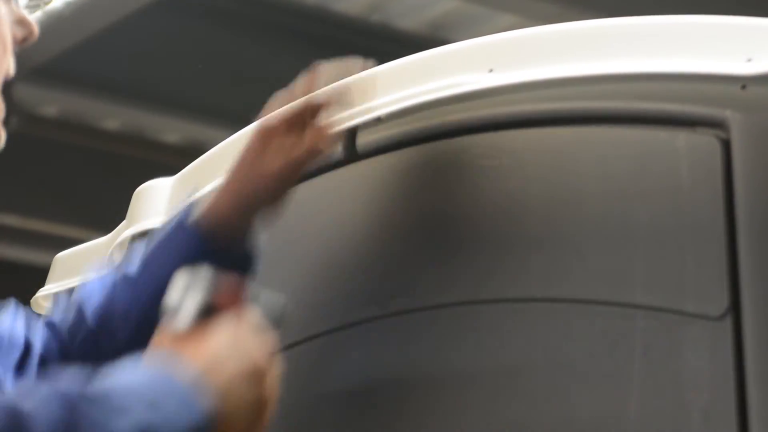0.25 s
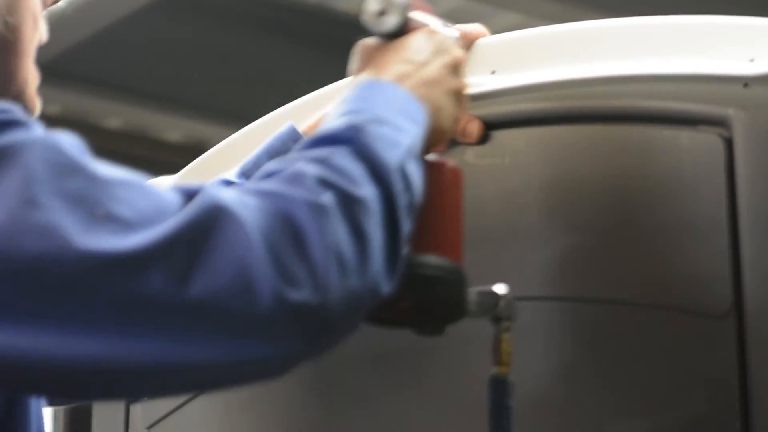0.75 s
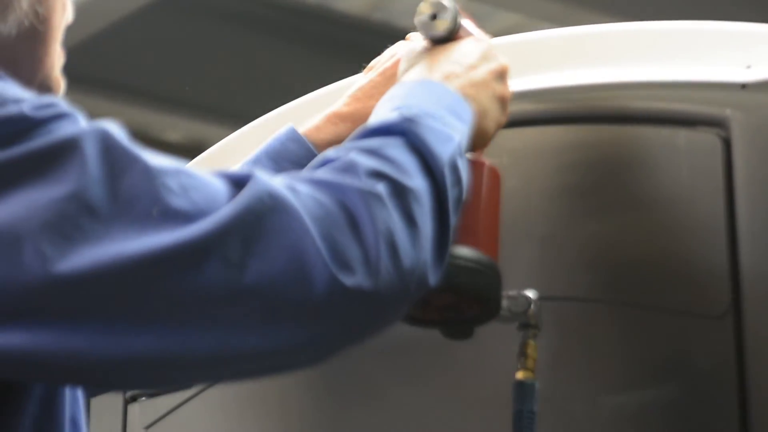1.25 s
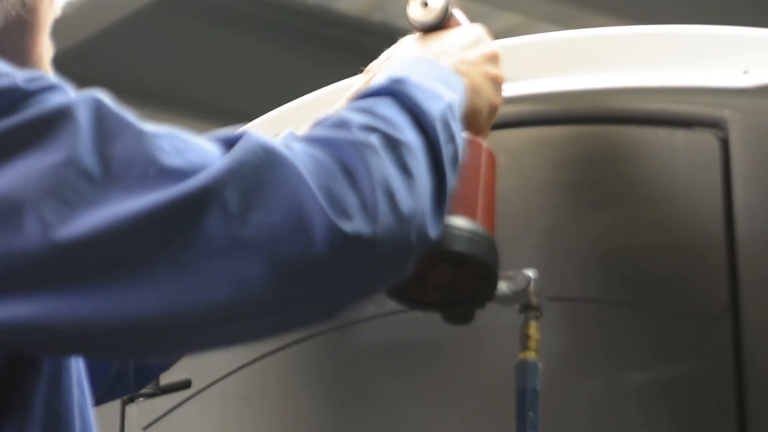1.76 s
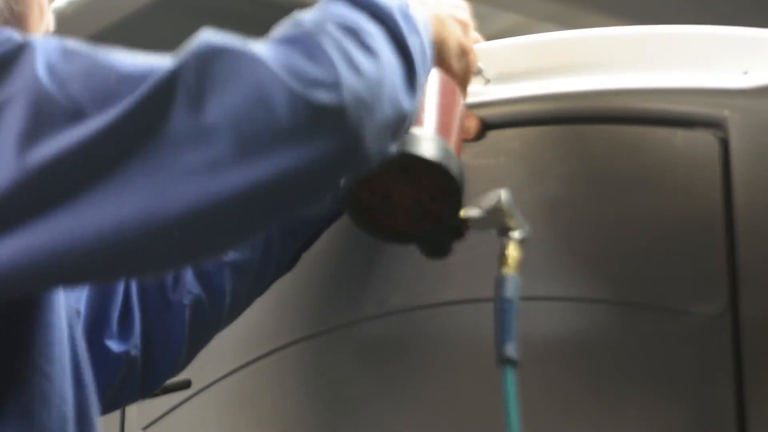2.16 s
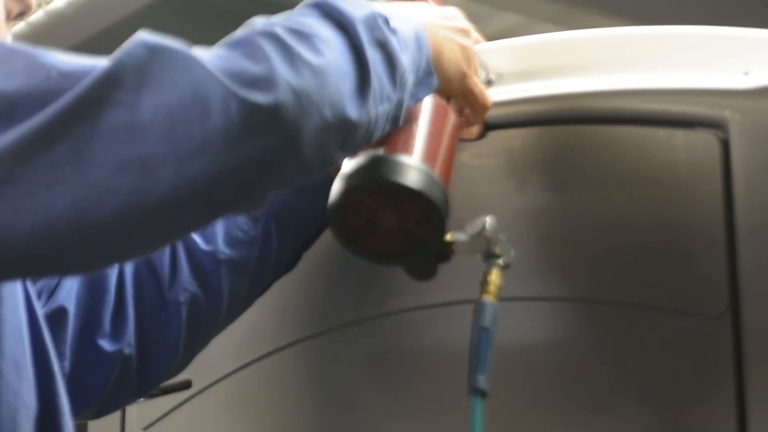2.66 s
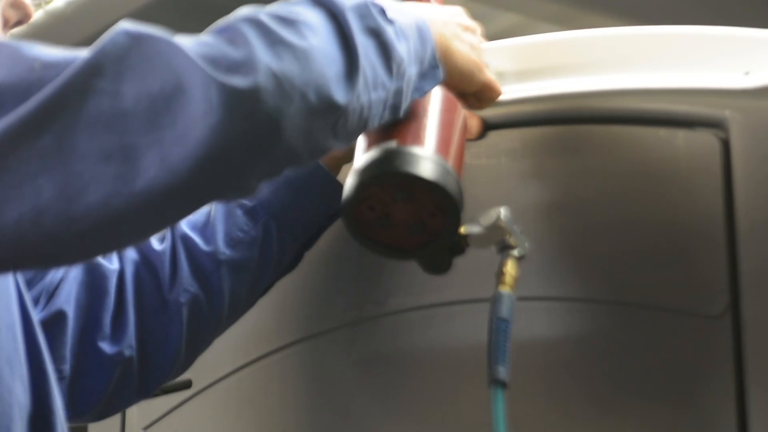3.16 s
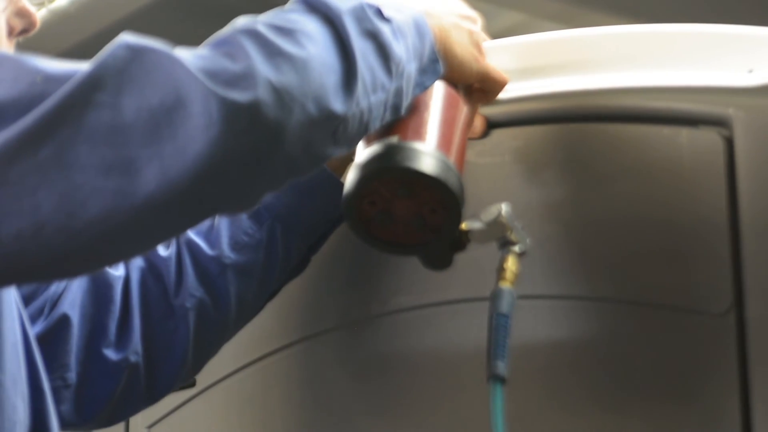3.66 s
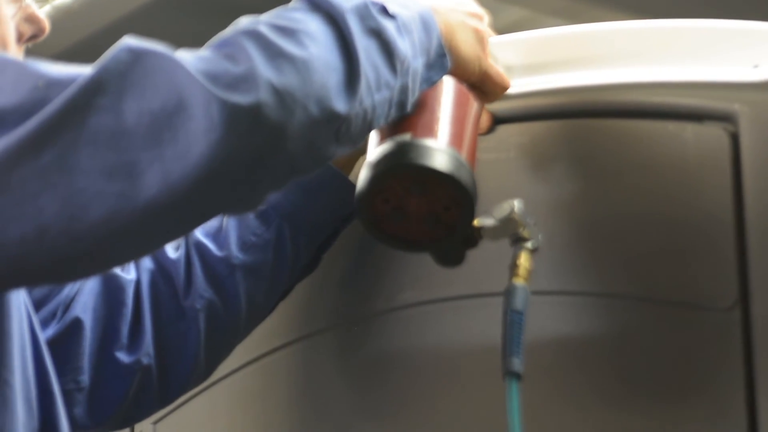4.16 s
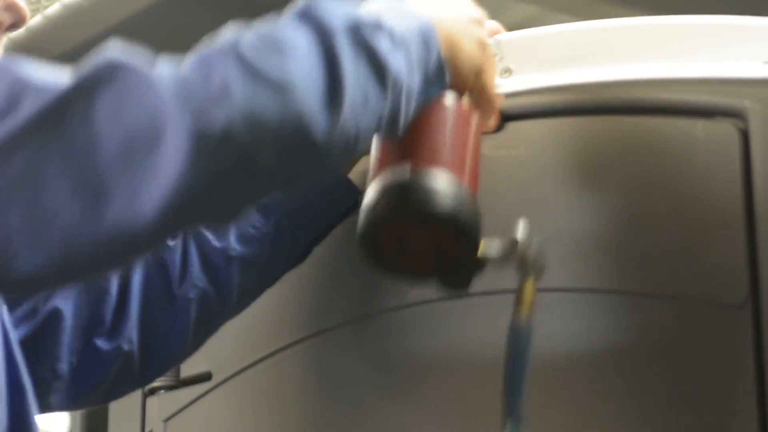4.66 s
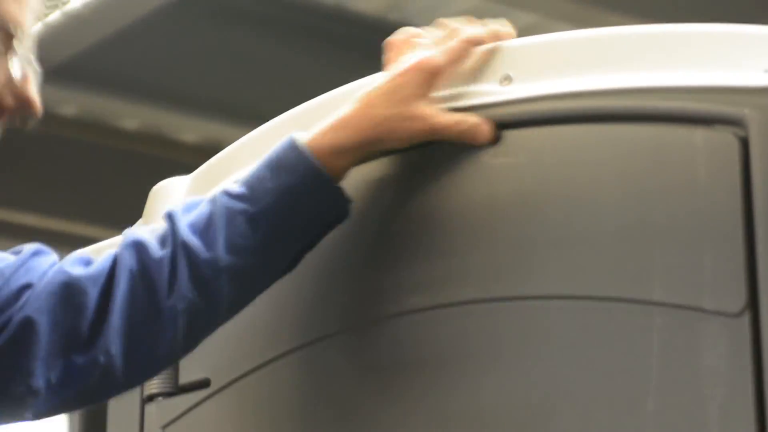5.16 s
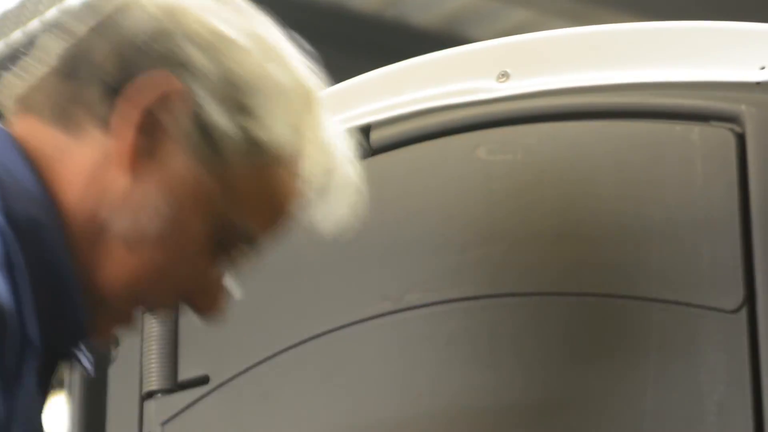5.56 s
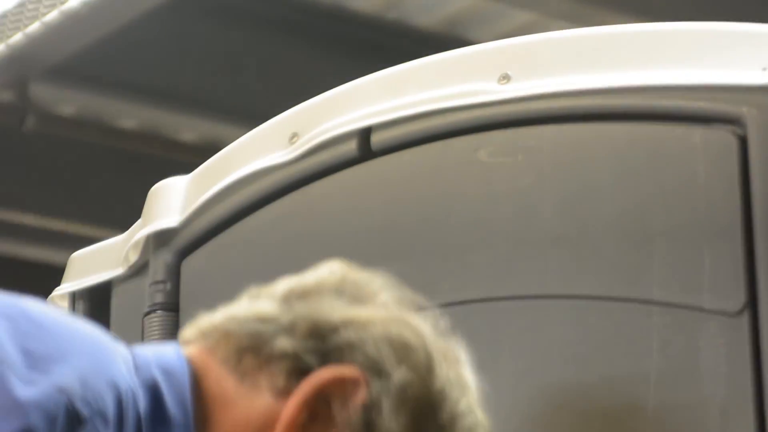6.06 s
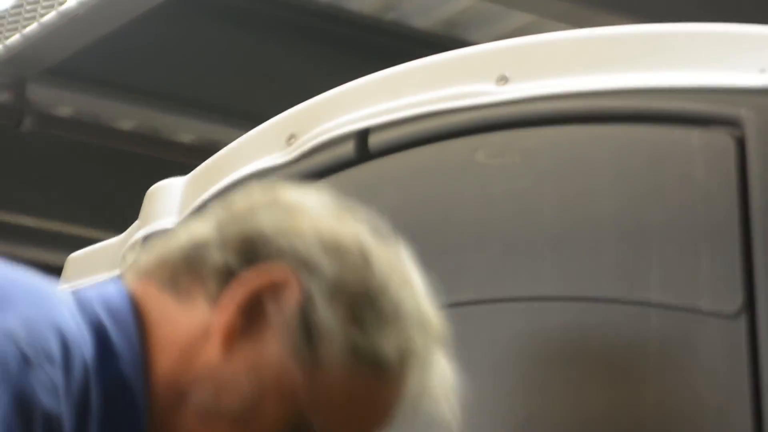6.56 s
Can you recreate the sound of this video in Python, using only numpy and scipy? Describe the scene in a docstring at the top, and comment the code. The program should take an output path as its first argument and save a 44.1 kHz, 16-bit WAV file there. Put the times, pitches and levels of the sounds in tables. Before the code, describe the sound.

In a reverberant assembly hall with constant ventilation, a distant air tool whines briefly. Close by, a rivet gun thumps against a plastic roof edge, hardest just after two seconds. A short rush of air gives way to a strong exhaust blast and swelling suction hiss. A second cycle snaps a rivet loudly, hisses again, and a dropped steel pin rings.

```python
"""In a reverberant assembly hall, steady ventilation noise washes throughout; a far air tool whines briefly.
A rivet gun knocks and is set against a plastic roof edge, its blows sounding through damped modes.
The gun cycles twice: shaped noise makes air rush in and blast out, then suction hisses; a rivet snaps.
Knocks and scuffs follow as the gun is put away, and a dropped steel pin rings as a throbbing tone."""
import sys
import numpy as np
from scipy import signal
from scipy.fft import rfft, irfft, next_fast_len
from scipy.io import wavfile

SR = 44100
rng = np.random.default_rng(int(sys.argv[2]) if len(sys.argv) > 2 else 0)


def to_wav(s):
    """Save 16-bit WAV."""
    ch = np.atleast_2d(s).T  # columns
    pcm = np.round(np.clip(ch, -1, 1) * 32767)  # PCM
    wavfile.write(sys.argv[1], SR, pcm.astype(np.int16))


N = 301070  # length in samples
T = np.arange(N) / SR
SIZE = next_fast_len(N, True)
HZ = np.fft.rfftfreq(SIZE, 1 / SR)

# Ventilation spectrum: pitch_hz, level_db
VENTILATION_COLOUR = [(15, -65), (25, -38), (174, -6), (205, -8), (291, 0), (324, -4.5), (449, -3),
                      (749, -1.5), (812, -3.5), (981, -1), (1280, -1.5), (1780, -4.5), (2520, -8),
                      (4330, -6.5), (15800, -9)]
VENTILATION_DB = -40.5
# Extra humps in the ventilation: pitch_hz, width_hz, level_db
VENTILATION_PEAKS = [(2160, 100, 6.9), (7030, 1400, 3.8)]
# How alike left and right are in diffuse sound: pitch_hz, correlation (no unit)
LIKENESS = [(25, 0.3), (70, 1), (300, 0.98), (1500, 1), (3000, 0.97), (5500, 0.8), (9000, 0.39),
            (15000, 0.11)]

# Runs of the far air tool: start_s, length_s, first_pitch_hz, last_pitch_hz, level_db
TOOL_RUNS = [(0.121, 0.066, 2010, 2250, -40.5), (.19, 0.092, 2080, 2290, -41),
             (0.291, .16, 2100, 2020, -39.5), (1.39, 0.27, 2164, 2060, -48)]
TOOL_RISE_S, TOOL_FADE_DB_PER_S = 0.02, 350
# Thin exhaust hiss of the far tool: pitch_hz, level_db
TOOL_EXHAUST_COLOUR = [(800, -17), (2200, 6), (3200, 1), (4500, -4), (7000, -40)]

# Time for the hall's tail to die by 60 dB: pitch_hz, decay_s
HALL_DECAY = [(100, 0.9), (1000, 0.91), (3000, 0.88), (6000, 0.7), (11000, 0.43), (16000, 0.39)]
# Strength of the hall's tail: pitch_hz, level_db
HALL_LEVEL = [(100, 7), (1000, 4), (4000, 2.5), (8000, 1), (15000, 0.5)]
# Echoes off the floor and nearby panels: delay_s, level_db
ECHOES = [(.0032, -15.5), (.0061, -13), (.0088, -14), (0.0134, -20.5), (0.0172, -4)]

# The gun's steel nose knocking against things: start_s, level_db, bass_db, treble_db, rattle_s
NOSE_KNOCKS = [(.4835, -15, 8.5, 1, 0.087), (4.423, -16, -3, -5, 0.14), (5.5825, -23, -19, -1.5, 0.014)]
# Tone of the nose: pitch_hz, level_db
NOSE_COLOUR = [(60, -26), (150, -19), (450, -11.5), (950, 2.5), (2150, 2.5), (2600, -7.5), (3200, -11),
               (3700, 0.5), (4700, -1), (5900, -4), (7200, -17.5), (15800, -16)]
# Resonances of the gun: pitch_hz, width_hz, level_db
GUN_MODES = [(1360, 160, 2.5), (1940, 480, 6.5)]

# Blows on the roof: start_s, level_db, bass_db, treble_db
ROOF_BLOWS = [(.613, -20.5, -7, -19), (0.8353, -22.5, -2.5, -6.5), (1.521, -31, -4, -12),
              (1.729, -31, 1, 8.5), (1.775, -39, 12, -10), (1.921, -41.5, 6, -8), (2.133, -30.5, -11, -30),
              (2.192, -24, -2, -43), (2.204, -18, 1, -11), (2.228, -7, 6, 0.5), (2.79, -36, 2, -22),
              (3.948, -23.5, -6, 9), (5.049, -25, -6, -25)]
# Tone of the roof: pitch_hz, level_db
ROOF_COLOUR = [(40, -39), (85, -16), (125, -5), (180, -6.5), (380, -2.5), (550, -1.5), (800, 0), (1400, 0),
               (2200, -7), (3200, -9), (4600, -8.5), (6500, -17.5), (15800, -20)]
# Resonances of the roof: pitch_hz, width_hz, level_db
ROOF_MODES = [(323, 19, 3), (496, 60, 1.5), (736, 300, 3.5), (890, 7.9, -23), (1170, 160, -2),
              (1770, 660, 1.5)]
ROOF_RATTLE_S = 0.055  # the loose panel's chatter after a blow dies by 60 dB in this time
# The piston kicks the roof just after each stroke begins
KICK_DELAY_S = 0.011
KICK_DB, KICK_BASS_DB, KICK_TREBLE_DB, KICK_RATTLE_S = -19.5, 15.5, 12.5, 0.2

# Cracks of steel pins, breaking in the jaws or dropping: start_s, level_db, bass_db, treble_db, rattle_s
PIN_CRACKS = [(2.228, -9, 3, -16, 0.004), (2.237, -34, 6, 6, 0.0036), (4.4725, 0, -14, 2, 0.012),
              (5.876, -32.5, -11, 3, 0.035), (6.03, -31.5, -10, 7.5, 0.02), (6.041, -26.5, -15, 14, 0.041)]
# Tone of the cracks: pitch_hz, level_db
PIN_COLOUR = [(100, -22), (1000, 9.5), (3500, 6.5), (7500, -0.5), (11000, -6), (15800, 0)]

# Air rushing through the valve with the trigger pulled: start_s, length_s, level_db
STROKES = [(2.897, .165, -17.3), (4.443, .13, -17)]
# Tone of the rush: pitch_hz, level_db
STROKE_COLOUR = [(180, -36), (300, 0), (454, -5.5), (563, -2.5), (1250, -5), (2120, -12.5), (4120, -3),
                 (5290, -5), (7010, 0), (15800, 0)]
VALVE_OPEN_S, VALVE_SHUT_DB_PER_S = 0.0043, 1200
BUILD_DB, BUILD_S = 8, 0.028  # the rush starts this far down and builds as the piston gets moving
# A jet throws its treble forward: pitch_hz, level_db
BEAM_COLOUR = [(200, -10.5), (1500, -7), (5000, -2.5), (12000, -1)]
# Roof shaken by the working piston: pitch_hz, level_db
SHUDDER_COLOUR = [(25, -27), (60, -27), (110, -10), (180, -9), (260, -0.5), (500, -17.5)]

# Clacks of piston, jaws and casing:
# start_s, level_db, bass_db, treble_db, rattle_s, rebound_gap_s, loss_per_rebound_db
GUN_CLACKS = [(2.905, -15.5, -27, -10, .014, 0.0087, 5), (3.9826, -17, -8, 6.5, 0.027, 0.029, 2),
              (4.472, -10, -14, 13, 0.13, .034, 2), (5.041, -26.5, 10.5, -26, .03, .014, 7),
              (5.37, -29.5, -10, 5, 0.078, .02, 2.5)]
# Tone of the clacks: pitch_hz, level_db
GUN_COLOUR = [(60, -33), (150, -31), (500, -20), (1000, 0.5), (2200, -5.5), (3000, -7.5), (4500, -12.5),
              (7200, -15), (15800, -21.5)]

# The cylinder emptying after each release: start_s, length_s, level_db, half_power_s, steepness (no unit)
VENTS = [(3.271, 1.15, -12, 0.13, 1.54), (4.635, .9, -18.5, 0.12, 1.34)]
# Tone of the vented air: pitch_hz, level_db
VENT_COLOUR = [(35, -50), (60, -50), (337, -13.5), (370, -13), (711, -8), (856, -8), (919, -8),
               (1010, -1.5), (2810, -5.5), (6220, -6.5), (11900, -5), (13400, -1.5), (15800, -9)]
# Resonances of the vented air: pitch_hz, width_hz, level_db
VENT_PEAKS = [(2400, 350, 1.5), (8700, 500, -3), (12400, 1000, 4.5), (15100, 680, 8)]
VENT_BUILD_DB, VENT_BUILD_S = 1, 0.005  # the exhaust port takes a moment to clear
# Rumble of exhaust air on the microphones: pitch_hz, level_db
GUST_COLOUR = [(12, -8), (35, -3), (80, 9.5), (200, 4.5), (500, 6), (1200, 3), (3000, -69)]

# Suction drawing the spent pin back after each release: start_s, length_s, crest_s, level_db
SUCTIONS = [(3.28, 1.16, 4.086, -27.5), (4.633, 0.96, 5.227, -28.5)]
# Tone of the suction: pitch_hz, level_db
SUCTION_COLOUR = [(100, -28.5), (400, -17.5), (1200, -6), (3500, -1.5), (6400, -15), (10000, -9.5),
                  (15800, -2)]
# Resonances of the suction: pitch_hz, width_hz, level_db
SUCTION_PEAKS = [(2090, 1200, 6), (2646, 400, 5.5), (5100, 1600, 8), (8270, 2160, 18), (13600, 1500, 7)]
SUCTION_SLOPE_DB_PER_S = 20.5  # swells to its crest and sinks again at this rate

# Hands, sleeves and gun sliding over the panels: start_s, length_s, level_db, bass_db
SCUFFS = [(3.991, 0.16, -35, 10), (5.752, 0.11, -40, 0), (6.212, 0.039, -42, -27),
          (6.298, 0.037, -44.5, -21), (6.7, 0.034, -49, 2)]
# Tone of the scuffs: pitch_hz, level_db
SCUFF_COLOUR = [(100, -31), (400, -4), (1200, 5), (2000, -1), (3000, -6.5), (8000, -20), (15800, -19)]
SCUFF_BASS_HZ = 550

PIN_S, PIN_RING_S = 6.034, 0.51  # the dropped pin starts to ring, and is stopped this much later
PIN_FACING_S = 6.141  # the spinning, tumbling pin faces the microphones squarely at this moment, when spin and tumble peak together
PIN_DB, PIN_FADE_DB_PER_S, PIN_STOP_DB_PER_S = -33.5, 21, 597

EDGE_HZ = 15850  # nothing much is left above this pitch


def amp(db):
    """Turn decibels into a plain multiplier."""
    return 10 ** (np.asarray(db) / 20)


def unit(x):
    """Scale a signal to an rms of 1."""
    return x / np.sqrt(np.mean(x ** 2) + 1e-20)


def read(points, hz):
    """Read a curve joined by straight lines on a log-frequency axis."""
    f, value = np.transpose(points)
    return np.interp(np.log(hz + 1), np.log(f + 1), value)


def add(mix, s, sound):
    """Add a sound into the mix from time s, cutting off what runs past the end."""
    part = mix[round(s * SR):][:len(sound)]
    part += sound[:len(part)]


def noise(db):
    """Noise of rms 1 with a given spectrum."""
    return unit(irfft(rfft(rng.standard_normal(SIZE)) * amp(db), SIZE)[:N])


def drift(rate_hz):
    """Random wandering of rms 1, mostly slower than the given rate."""
    return noise(-20 * np.log10(1 + (HZ / rate_hz) ** 4))


def humps(peaks, at=HZ):
    """Resonances as a dB curve."""
    return sum(db / (1 + (2 * (at - hz) / width) ** 2) for hz, width, db in peaks)


def pair(a, b):
    """Two unrelated signals become a diffuse field at two close microphones."""
    size = next_fast_len(len(a), True)
    same = np.clip(read(LIKENESS, np.fft.rfftfreq(size, 1 / SR)), -1, 1)
    mid = rfft(a, size) * np.sqrt((1 + same) / 2)
    side = rfft(b, size) * np.sqrt((1 - same) / 2)
    return irfft(np.array([mid + side, mid - side]), size)[:, :len(a)]


def gate(s, length, rise_s, fade_db_per_s):
    """Gain that starts to rise at s and starts to fade once the length is over."""
    return np.clip((T - s) / rise_s, 0, 1) * amp(-fade_db_per_s * np.maximum(T - s - length, 0))


def causal(db):
    """Minimum-phase impulse response (it acts as early as it can) of a full-circle dB curve."""
    return np.fft.ifft(np.exp(np.conj(signal.hilbert(np.log(amp(db)))))).real


def rattle(t60):
    """A dying flurry of contacts, of energy 1, that excites all frequencies about evenly."""
    t = T[:SR // 2]
    spectrum = rfft(rng.standard_normal(len(t)) * amp(-60 * t / t60))
    even = irfft(spectrum / abs(spectrum), len(t))
    force = even / (1 + (t / t60) ** 8)  # cut away the late remains
    return force / np.linalg.norm(force)


def strikes(rows, colour, modes, crack_db, bass_hz, treble_hz):
    """Each blow is a crack and a short rattle, sounding through the body's damped modes."""
    out = np.zeros(N)
    hz = abs(np.fft.fftfreq(4096, 1 / SR))
    for s, db, bass_db, treble_db, rattle_s in rows:
        force = rattle(rattle_s)
        force[0] = amp(crack_db)
        bass_tilt_db = bass_db / (1 + (hz / bass_hz) ** 3)
        treble_tilt_db = treble_db / (1 + (treble_hz / (hz + 1)) ** 3)
        body = causal(read(colour, hz) + humps(modes, hz) + bass_tilt_db + treble_tilt_db)
        sound = signal.fftconvolve(force, body)
        # the level is that of the same energy spread over 10 ms
        add(out, s, amp(db) * sound * np.sqrt(SR / 100) / np.linalg.norm(sound))
    return out


def ventilation(swell_db=0.96, apart_db=-19):
    """The steady wash of fans and air lines, with a faint share unrelated between the microphones."""
    colour_db = read(VENTILATION_COLOUR, HZ) + humps(VENTILATION_PEAKS)
    shared = pair(noise(colour_db), noise(colour_db))
    apart = np.array([noise(colour_db), noise(colour_db)])
    return amp(VENTILATION_DB + swell_db * drift(8.2)) * (shared + amp(apart_db) * apart)


def far_tool(jitter_hz=18, waver_hz=24, overtone_db=-12, exhaust_db=-6):
    """A small air motor glides and wavers in pitch through each run, with a thin exhaust hiss."""
    exhaust = amp(exhaust_db) * noise(read(TOOL_EXHAUST_COLOUR, HZ))
    waver = jitter_hz * drift(133) + waver_hz * drift(29)
    out = np.zeros(N)
    for s, length, first_hz, last_hz, db in TOOL_RUNS:
        pitch_hz = np.interp(T, [s, s + length], [first_hz, last_hz]) + waver
        turn = 2 * np.pi * np.cumsum(pitch_hz) / SR
        whine = np.sin(turn) + amp(overtone_db) * np.sin(2 * turn)
        out += amp(db) * gate(s, length, TOOL_RISE_S, TOOL_FADE_DB_PER_S) * (whine + exhaust)
    return out * amp(2 * drift(25))


def hall(build_s=0.0018):
    """Impulse response of the hall: a diffuse tail that dies faster in the treble."""
    hz, t, grains = signal.stft(rng.standard_normal((2, SR * 5 // 4)), SR, nperseg=256)
    decay = amp(-60 * t / read(HALL_DECAY, hz)[:, None]) * (1 - np.exp(-t / build_s))
    decay /= np.sqrt((decay ** 2).sum(1, keepdims=True) * t[1] * SR)  # equal energy at each pitch
    tail = grains * decay * amp(read(HALL_LEVEL, hz))[:, None]
    return pair(*signal.istft(tail, SR, nperseg=256)[1])


def reverberate(x, count=3):
    """Several random hall responses take turns, so that no single one colours the steady hiss."""
    turns = 1.7 * T + np.arange(count)[:, None] / count  # 1.7 rounds per second
    shares = np.maximum(np.cos(2 * np.pi * turns), 0)
    shares /= np.linalg.norm(shares, axis=0)
    out = sum(signal.fftconvolve(x * share, hall(), axes=1)[:, :N] for share in shares)
    for s, db in ECHOES:
        out += amp(db) * np.pad(x, ((0, 0), (round(s * SR), 0)))[:, :N]
    return out


def nose_knocks():
    """The steel nose strikes something and rings through the gun's resonances."""
    return strikes(NOSE_KNOCKS, NOSE_COLOUR, GUN_MODES, crack_db=-11, bass_hz=750, treble_hz=4000)


def roof_hits():
    """List all that strikes the roof: the blows, and one kick for each stroke."""
    kicks = [(s + KICK_DELAY_S, KICK_DB, KICK_BASS_DB, KICK_TREBLE_DB, KICK_RATTLE_S)
             for s, _, _ in STROKES]
    return [(*blow, ROOF_RATTLE_S) for blow in ROOF_BLOWS] + kicks


def roof_blows():
    """Blows and kicks make the plastic panel chatter and sound through its resonances."""
    return strikes(roof_hits(), ROOF_COLOUR, ROOF_MODES, crack_db=-10, bass_hz=307, treble_hz=3140)


def roof_boom(hz=106, t60=0.59, db=-18, build_s=0.067):
    """Strong, bassy hits set the whole roof shell swinging most in its lowest mode."""
    out, t = np.zeros(N), T[:SR]
    swing = (1 - np.exp(-t / build_s)) * amp(-60 * t / t60) * np.sin(2 * np.pi * hz * t)
    for s, blow_db, bass_db, _, _ in roof_hits():
        add(out, s, amp(db + blow_db + bass_db) * swing)
    return out


def pin_cracks():
    """Steel pins break or drop with a bright crack and a very short rattle."""
    return strikes(PIN_CRACKS, PIN_COLOUR, [], crack_db=6, bass_hz=700, treble_hz=6000)


def valve(s, length, build_db, build_s):
    """Flow through a valve that snaps open, builds to full strength and shuts."""
    build = amp(-build_db * np.exp(-np.maximum(T - s, 0) / build_s))
    return gate(s, length, VALVE_OPEN_S, VALVE_SHUT_DB_PER_S) * build


def stroke_flow():
    """Air driving the piston while the trigger is pulled."""
    return sum(amp(db) * valve(s, length, BUILD_DB, BUILD_S) for s, length, db in STROKES)


def vent_flow():
    """The exhaust holds while the piston returns, then sinks with the pressure."""
    flow = np.zeros(N)
    for s, length, db, half_s, steepness in VENTS:
        fall = np.hypot(1, (abs(T - s) / half_s) ** steepness)
        flow += amp(db) * valve(s, length, VENT_BUILD_DB, VENT_BUILD_S) / fall
    return flow


def suction_flow(rise_s=0.05, fade_db_per_s=350):
    """The suction swells and sinks once after each release."""
    return sum(amp(db - SUCTION_SLOPE_DB_PER_S * abs(T - crest_s)) * gate(s, length, rise_s, fade_db_per_s)
               for s, length, crest_s, db in SUCTIONS)


def jet(flow, colour_db, spread_db):
    """Turbulent air: a faintly fluttering hiss whose treble differs between the microphones."""
    treble = 1 / (1 + (6500 / (HZ + 1)) ** 2)
    side = irfft(rfft(noise(colour_db), SIZE) * treble, SIZE)[:N] * amp(spread_db)
    flutter = amp(0.5 * drift(60))
    return flow * flutter * (noise(colour_db) + np.array([side, -side]))


def air(pipe_hz=855, pipe_db=3, leak_db=-7):
    """Valve rush, cylinder vent and suction; some vented air leaks out through the suction tube."""
    vent = vent_flow()
    beam_db = read(BEAM_COLOUR, HZ)
    passage_db = -pipe_db * np.cos(np.pi * HZ / pipe_hz)  # odd resonances of a passage closed at one end
    rush = jet(stroke_flow(), read(STROKE_COLOUR, HZ) + beam_db + passage_db, spread_db=-17)
    blast = jet(vent, read(VENT_COLOUR, HZ) + beam_db + humps(VENT_PEAKS), spread_db=-17)
    tube_flow = np.hypot(suction_flow(), amp(leak_db) * vent)
    suction = jet(tube_flow, read(SUCTION_COLOUR, HZ) + humps(SUCTION_PEAKS), spread_db=-27)
    return rush + blast + suction


def buffet(gust_db=-30, steepness=3.2, shudder_db=-13):
    """The piston's stroke shudders through the roof; vented air rumbles on each microphone apart."""
    shudder = stroke_flow() * noise(read(SHUDDER_COLOUR, HZ))
    vent = vent_flow()
    rumble = np.array([noise(read(GUST_COLOUR, HZ)) for _ in range(2)])
    gusts = rumble * (vent / vent.max()) ** steepness
    return amp(gust_db) * gusts + amp(shudder_db) * shudder


def gun_clacks(count=3):
    """Gun parts clack through its resonances, each clack with evenly spaced, weakening rebounds."""
    hits = [(s + k * gap, db - k * loss_db, bass_db, treble_db, rattle_s)
            for s, db, bass_db, treble_db, rattle_s, gap, loss_db in GUN_CLACKS
            for k in range(count)]
    return strikes(hits, GUN_COLOUR, GUN_MODES, crack_db=-3, bass_hz=710, treble_hz=4770)


def scuffs(rise_s=0.008, fade_db_per_s=450, grain_db=3):
    """Grainy friction noise while something slides; firm pressure brings out the panel's bass."""
    colour_db = read(SCUFF_COLOUR, HZ)
    bass = 1 / (1 + (HZ / SCUFF_BASS_HZ) ** 3)
    rubs = np.zeros(N)
    for s, length, db, bass_db in SCUFFS:
        rubs += amp(db) * gate(s, length, rise_s, fade_db_per_s) * noise(colour_db + bass_db * bass)
    return rubs * unit(amp(grain_db * drift(110)))


def pin(hz=6401, spin_hz=21, swing_db=5, tumble_hz=4.9, tumble_db=2):
    """A steel pin rings on one bending mode, throbbing as it spins; loudest facing the microphones."""
    turn = 2 * np.pi * (T - PIN_FACING_S)
    spin = swing_db * np.cos(spin_hz * turn + 0.3 * drift(4.6))
    tumble = tumble_db * np.cos(tumble_hz * turn)
    fade = amp(PIN_DB - PIN_FADE_DB_PER_S * np.maximum(T - PIN_S, 0))
    ring = gate(PIN_S, PIN_RING_S, 0.0031, PIN_STOP_DB_PER_S) * fade
    tone = np.sin(2 * np.pi * np.cumsum(hz + 9 * drift(42)) / SR)  # the pitch trembles slightly
    return ring * amp(spin + tumble) * tone


def scene():
    """Add the direct sounds, their reverberation in the hall and the ventilation."""
    whine = far_tool()
    near = nose_knocks() + roof_blows() + pin_cracks() + air() + gun_clacks() + scuffs()
    ring = pin()
    direct = near + whine + ring + roof_boom() + buffet()
    return direct + reverberate(near + 0.5 * whine + amp(-5) * ring) + ventilation()


def record(dry):
    """The loudest peaks overload and are cut flat; then a filter removes the highest treble."""
    clipped = np.clip(dry, -1, 1)
    low_pass = signal.firwin(511, EDGE_HZ, window=("kaiser", 9), fs=SR)
    return signal.oaconvolve(clipped, low_pass[None], "same")


dry = scene()
out = record(dry)
to_wav(out)
```